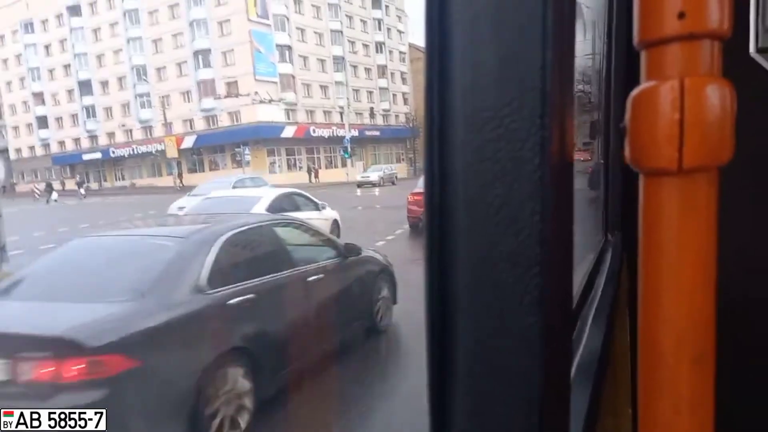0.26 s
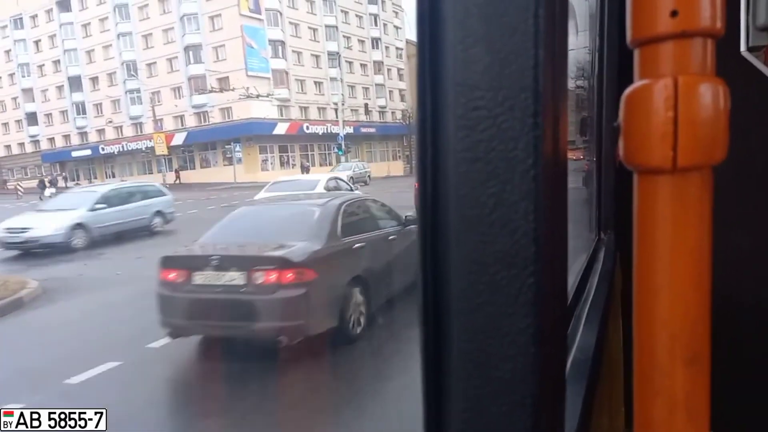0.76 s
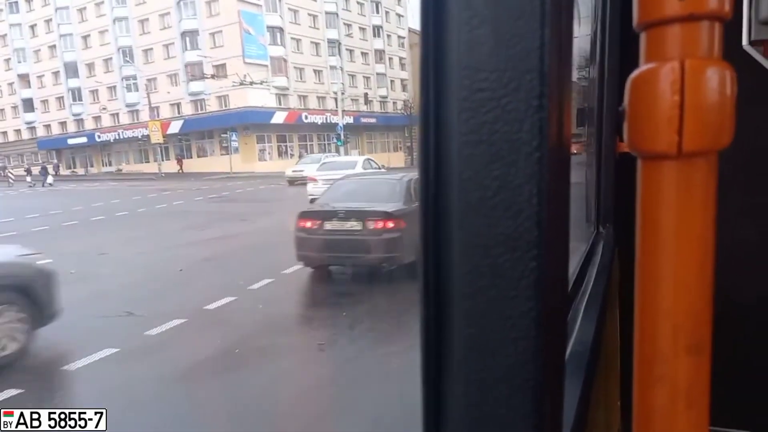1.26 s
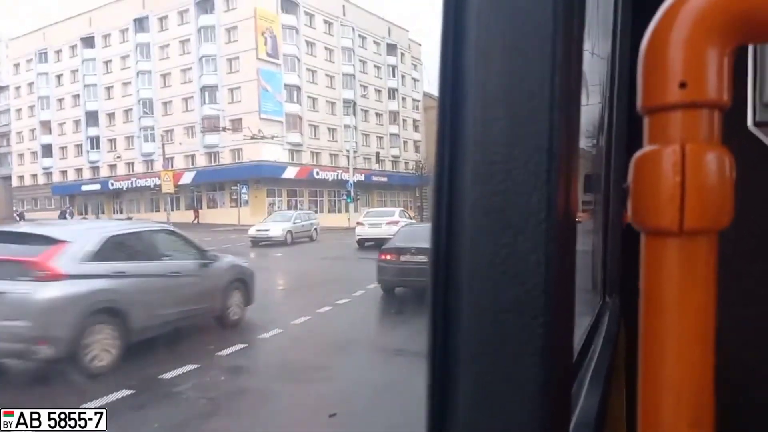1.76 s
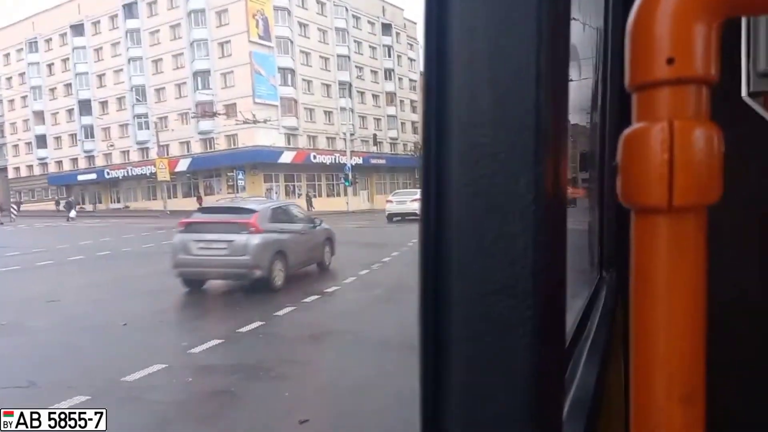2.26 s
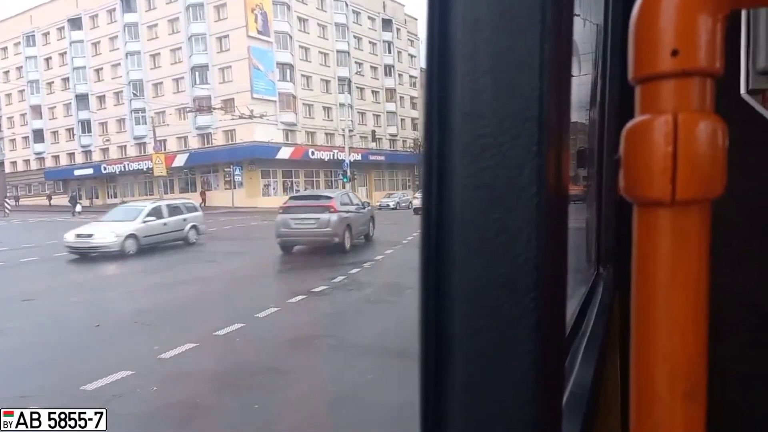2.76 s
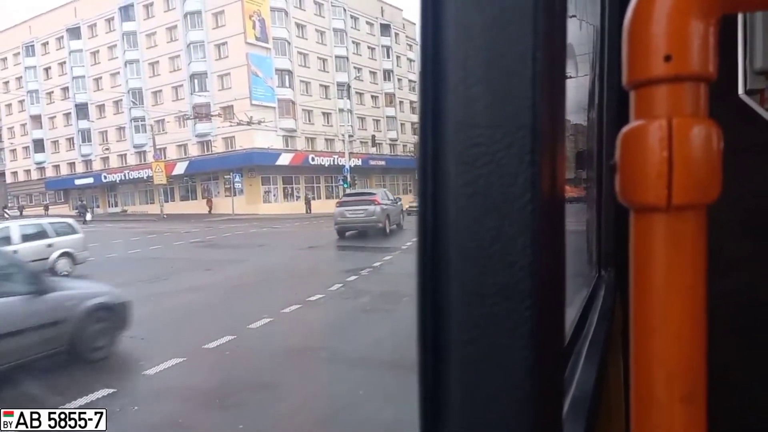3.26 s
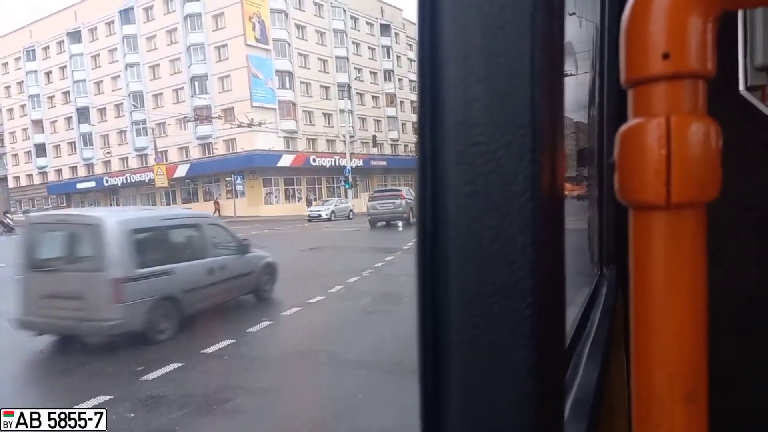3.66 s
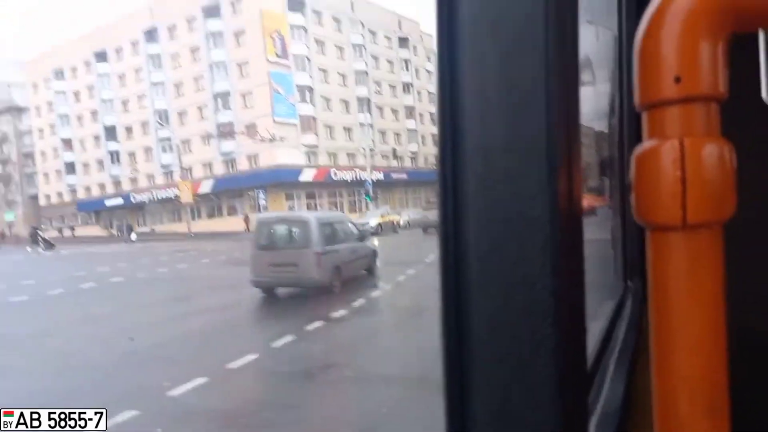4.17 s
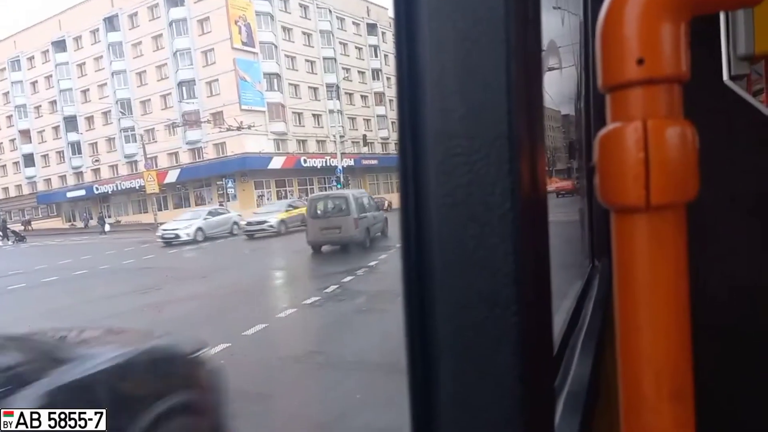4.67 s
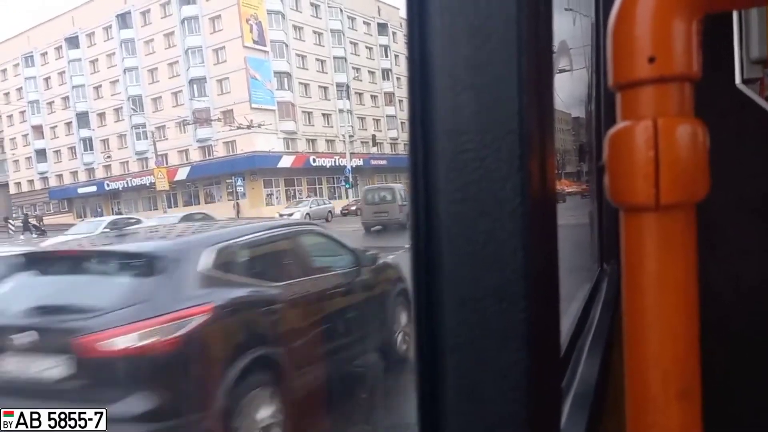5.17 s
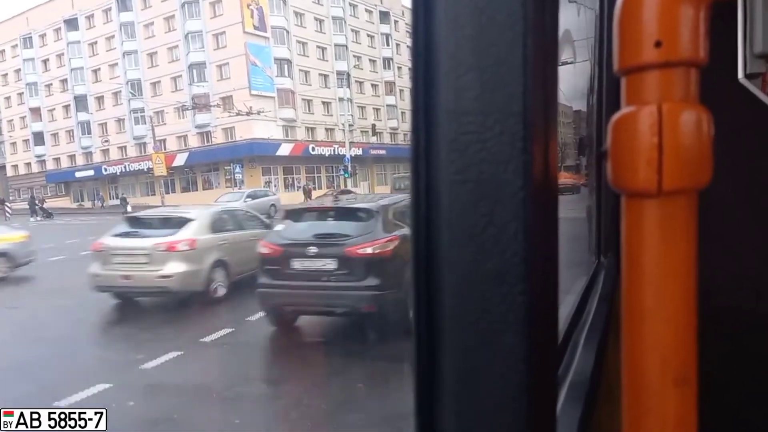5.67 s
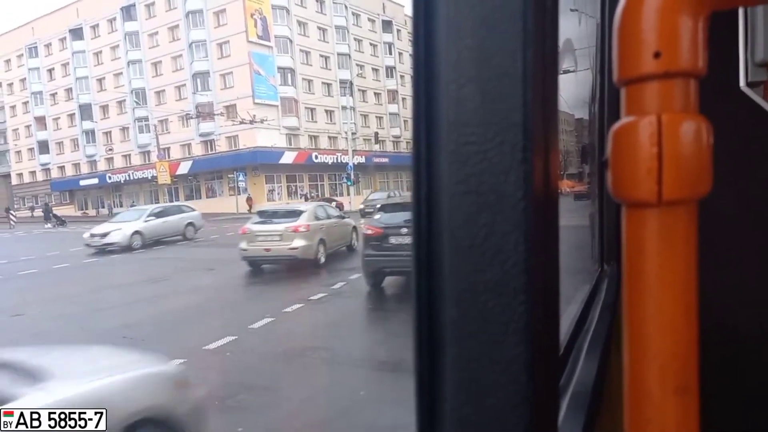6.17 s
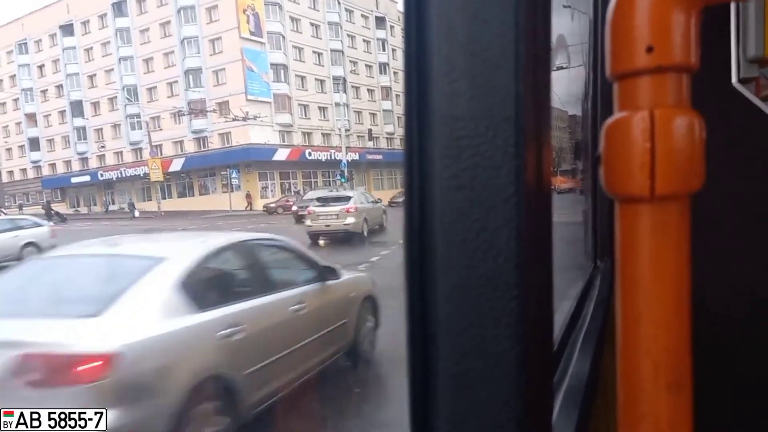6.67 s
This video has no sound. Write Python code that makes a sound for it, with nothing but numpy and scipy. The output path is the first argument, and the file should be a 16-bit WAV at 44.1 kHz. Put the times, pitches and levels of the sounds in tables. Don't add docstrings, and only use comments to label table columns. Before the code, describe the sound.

Heard on a phone inside a waiting bus, a diesel idles with a slow, unsteady low boom that fills the cabin. Close by, another heavy diesel pulls away, its tone climbing, then dropping at a gear shift with a faint airy hiss and thin squeal. It recedes as cars drone by over wet asphalt, their low notes swelling within a constant dull roar.

```python
import sys
import numpy as np
from scipy import signal
from scipy.fft import irfft, next_fast_len
from scipy.io import wavfile
from scipy.ndimage import uniform_filter1d

SR = 44100
rng = np.random.default_rng(int(sys.argv[2]) if len(sys.argv) > 2 else 0)


def transcribe(u):
    v = np.clip(np.atleast_2d(u).T, -1, 1)
    q = np.round(v * 32767).astype(np.int16)
    wavfile.write(sys.argv[1], SR, q)


def natural_amplitude(level_db):
    exponent = np.asarray(level_db, float) / 20
    return 10 ** exponent


N = 305613
T = np.arange(N) / SR

# (pitch [Hz], level [dB])
HUM_LINES = [(388, -52), (428, -49), (528, -52)]

# (frequency [Hz], density [dB
# per Hz], left minus right [dB], likeness of the ports [-1..1])
ROAR_COLOUR = [(30, 8, 1, .96), (50, 10, -1, .98), (66, 18, -1, .98), (78, 23, -1, .98), (95, 19, -1, .99),
               (125, 14, 0, .99), (180, 11, 0, .99),
               (230.4, 11, 2.5, 1), (336, 1, -1, 0.52), (470, 2, 0, 0.85), (796, -5, .5, -0.024),
                (990, -5.5, 0.5, -0.25), (1320, -9, 3.5, -0.35), (1486, -9.5, -1, 0.086),
                (1850, -15, -4, -0.37),
               (2050, -12, -4.5, 0), (2600, -16, -4, .1), (3020, -17.5, -2, -0.14),
               (4890, -20, -3.5, 0.086), (5340, -20.5, 0, 0.65), (5940, -16.5, -2, 1),
               (6470, -25, -8, 0.69), (6910, -32.5, -17, 0.1), (7200, -38, -7, .5), (8200, -40.5, -2, .65),
               (8300, -42, -3, 0.071), (11100, -40, -5.5, 0.63), (12800, -47, -8.5, 0.41),
               (15200, -46, 6, 0.27)]
# (time [s], swell [dB])
TRAFFIC_SWELL = [(0, 1), (.6, -1.5), (1.2, -1.5), (1.8, 1.5), (2.7, -0.5), (4, 1.07), (5, 2), (6.1, 0.5),
                 (6.93, 1.2)]
# (level [dB], share of the swell [0..1], creep [dB/s])
ROAR_LAYERS = [(0, 0.13, 0.4256), (-0.8, 0.56, 0.1738), (0, .9, 0.045), (-1.3, .4, 0.1)]

# (middle [s], pitch [Hz], half length [s],
# level [dB])
PASSING_CARS = [(.4, 476, 0.14, -40), (1.404, 69.3, 0.21, -26.5), (2.103, 74.7, 0.33, -21.5),
                (3.1, 428, 0.062, -37.5), (3.649, 80.76, .3, -22.5), (3.52, 148.6, .14, -29.5),
                (3.55, 231.7, .1, -33), (3.95, 238.2, 0.12, -34.5), (4.0, 110.2, 0.12, -29.5),
                (4.2, 71.2, 0.12, -20.5), (4.72, 72.57, 0.2, -14.5), (5.0, 149.5, 0.17, -30),
                (5.5, 67.9, .27, -27), (6.15, 545, .16, -42.5), (6.2, 79.5, 0.18, -20.5),
                (6.2, 33.3, .09, -32), (6.65, 76.5, 0.35, -24.5), (6.65, 148, 0.05, -27),
                (6.75, 133.3, .19, -25.5), (6.85, 238.6, 0.078, -33)]

# (time [s], firing rate [Hz], boom of the 3rd multiple [dB])
IDLE_CURVE = [(0, 29.35, -26), (.4, 29.25, -27), (1.05, 28.86, -22.5), (1.4, 28.9, -24.5),
              (1.75, 29.15, -16), (2.45, 29.84, -19), (2.8, 30.05, -22.5), (2.95, 29.93, -39),
              (3.2, 30, -20), (3.85, 29.6, -15), (4.2, 29.76, -20.5), (4.55, 29.82, -25.5),
              (5.25, 29.69, -23), (6.0, 29.78, -21.5), (6.2, 29.97, -35), (6.93, 29.63, -40.5)]
# (multiple of the firing rate [1], level [dB])
IDLE_MULTIPLES = [(1, -46), (1.5, -47), (2, -32), (4, -33), (5, -34), (6, -41), (7, -41), (8, -41),
                  (9, -46), (10, -47)]
REST_DB, REST_FOLLOWS = -1, 0.18

# (opens [s], attack [s], hold [s], jet [dB], opening [-1 narrow, thin .. 1 wide, rushing])
PUFFS = [
    (1.13, 0.13, .1, -56, -0.69),
    (1.438, 0.046, .05, -61, .5),
    (1.6, 0.033, 0.089, -66.5, .2),
    (1.712, 0.044, 0.14, -53.5, .8),
    (3.312, .05, 0.28, -65.5, .1),
    (3.678, 0.089, 0.28, -70, 0.4),
]
# (over the jet [dB], tilt [dB per unit of opening], dying [dB/s])
VENT_BANDS = [(0.5, 0, 99.5), (-1.5, -7.5, 111.5), (5.5, -6, 69), (4, 4, 68.5), (4, 7, 98)]
LEAK_DB, LEAK_DB_PER_S = -11.5, 41.5
VALVE_PAN_DB = -8

# (time [s], firing rate [Hz], load [dB], bark on the upper multiples [dB])
PULL_AWAY = [(0, 78.59, -8, 1.5), (.15, 81.86, -6.5, -9.5), (.3, 84.87, -11, -1), (.52, 89.91, -14, -5.5),
             (.9, 96.44, -18, 3), (1.16, 99.2, -16, -7), (1.27, 95.37, -18.5, -10), (1.36, 84.7, -26.5, 8),
             (1.5, 79.27, -10, -2), (1.75, 77.95, -17.5, 2), (2.02, 79, -20, 8.5),
             (2.3, 81.77, -15.5, -5.5), (3.0, 86.95, -25.5, 2), (4.0, 95.84, -30, 0), (5.0, 107, -23, 0),
             (5.5, 110.8, -23.5, 1), (6.0, 117.5, -32, -2), (6.93, 123.2, -28, 2.5)]
# (level at the pipe [dB], extra fading once it recedes [dB/s], left minus right [dB], lag [rad])
EXHAUST_STACK = [(0, 0.5, -1.3, 0.067), (-6.5, 5, 0, .03), (-14, 14, 0, 0.72), (-23, 11, 3.7, 0.66),
                 (-32, 7, 1.5, 1)]
RECEDES_S = 2.08
# (frequency [Hz], gain [dB])
WALL_GAIN = [(78, -0.5), (98, -2), (158, 0.5), (190, -1.5), (245, 0.5), (285, -4.5), (325, -0.5), (390, -6)]

# (from [Hz], to [Hz], patch height [Hz], share dropped left [0..1], right [0..1])
TREBLE_HOLES = [(6950, 7300, 350, .9, .15), (7300, 8250, 480, .95, .6), (8250, 8900, 330, .5, .2),
                (8900, 15000, 190, .33, .2), (15000, 15800, 400, .4, .1)]


def columns(table):
    s, *values = np.transpose(table)
    return [np.interp(T, s, v) for v in values]


def walk(rate):
    k = int(SR / rate)
    held = np.repeat(rng.standard_normal(N // k + 1), k)
    return 1.62 * uniform_filter1d(uniform_filter1d(held, k), k)[:N]


def band(lo_hz, hi_hz, likeness, edge=.06):
    size = next_fast_len(N)
    first = int(lo_hz * (1 - 2 * edge) * size / SR)
    hz = np.arange(first, int(hi_hz * (1 + 2 * edge) * size / SR)) * SR / size
    above_lo = np.tanh(np.log(hz / lo_hz) / edge * 2)
    above_hi = np.tanh(np.log(hz / hi_hz) / edge * 2)
    shape = np.sqrt((above_lo - above_hi) / 2)
    grain = rng.standard_normal((2, len(hz))) + 1j * rng.standard_normal((2, len(hz)))
    bins = np.zeros((2, size // 2 + 1), complex)
    bins[:, first:first + len(hz)] = shape * grain
    mid, side = (v / v.std() for v in irfft(bins, size)[:, :N])
    c = np.clip(likeness, -.99, .99)
    return (np.sqrt(1 + c) * mid + np.sqrt(1 - c) * side * np.array([[1], [-1]])) / np.sqrt(2)


def ports(pan_db):
    return natural_amplitude(np.array([pan_db / 2, -pan_db / 2]).reshape(2, -1))


def tone(turns, db, lag=0.):
    return np.sqrt(2) * natural_amplitude(db) * np.sin(2 * np.pi * turns - np.array([[0], [lag]]))


def hum():
    out = 0
    for hz, db in HUM_LINES:
        turns = np.cumsum(hz * (1 + .008 * walk(4))) / SR
        out = out + tone(turns, db + 3.5 * walk(6), .6)
    return out


def roar(phase):
    traffic_db = columns(TRAFFIC_SWELL)[0]
    boom_db, rumble_db, body_db, spray_db = (
        db + share * traffic_db + creep * T for db, share, creep in ROAR_LAYERS)
    hz, *colours = np.transpose(ROAR_COLOUR)
    third_octaves = 29 * 2 ** np.arange(0, 5.0, 1 / 3)
    finer_bands = 970 * 2 ** np.arange(0, 4.01, 1 / 7)
    edges = np.concatenate([third_octaves, finer_bands])
    shake = 1 + .07 * np.cos(2 * np.pi * phase)
    out, swell = 0, walk(1.9)
    for lo, hi in zip(edges[:-1], edges[1:]):
        middle = np.log(lo * hi) / 2
        density_db, pan_db, likeness = [np.interp(middle, np.log(hz), v) for v in colours]
        if lo < 300:
            drive_db = boom_db
        elif lo < 750:
            drive_db = rumble_db
        else:
            drive_db = body_db if lo < 3000 else spray_db
        flicker_db = .25 * swell + (1.1 if lo < 750 else .7) * walk(5)
        gain = natural_amplitude(density_db - 63.0 + 10 * np.log10(hi - lo) + drive_db + flicker_db)
        if 300 < lo < 3000:
            gain = gain * shake
        out = out + gain * ports(pan_db) * band(lo, hi, likeness, .04)
    return out


def cars():
    out = 0
    for s, hz, half, db in PASSING_CARS:
        passing = np.exp(-((T - s) / half) ** 2 / 2)
        out = out + passing * tone(hz * (T - s), db, 0.093)
    return out


def idle():
    hz, boom_db = columns(IDLE_CURVE)
    rest_db = REST_DB + REST_FOLLOWS * (boom_db - boom_db.mean())
    turns = np.cumsum(hz * (1 + .001 * walk(6))) / SR
    out = ports(-1.1) * tone(3 * turns + 0.33, boom_db + 2.2 * walk(13), .12)
    for order, db in IDLE_MULTIPLES:
        out = out + tone(order * turns + rng.random(), db + rest_db + 2.5 * walk(3), .03)
    return out, turns % 1


def squeal():
    swell = np.exp(-((T - 1.48) / .1) ** 2 / 2)
    return natural_amplitude(-49.0) * swell * ports(VALVE_PAN_DB) * band(2200, 2850, .2, .08)


def air():
    out = squeal()
    noises = (band(8200, 13300, .9, 0.071), band(13300, 15700, .8, .03), band(6200, 6850, .55, .04),
              band(5500, 6400, .5, .05), band(1200, 5900, .26))
    flutter = natural_amplitude(0.67 * walk(25)) * ports(VALVE_PAN_DB)
    for (db, per_opening, dying), noise in zip(VENT_BANDS, noises):
        power = 0
        for s, attack, hold, jet_db, opening in PUFFS:
            rise = np.clip((T - s) / attack, 0, 1) ** 2
            shut = np.maximum(T - s - attack - hold, 0)
            fall = natural_amplitude(-dying * shut) ** 2 + natural_amplitude(LEAK_DB - LEAK_DB_PER_S * shut) ** 2
            power = power + (rise * natural_amplitude(jet_db + db + per_opening * opening)) ** 2 * fall
        out = out + flutter * np.sqrt(power) * noise
    return out


def neighbour():
    hz, load_db, bark_db = columns(PULL_AWAY)
    turns = np.cumsum(hz * (1 + .0015 * walk(14))) / SR
    start = (.66, .8, .3, .6, .1)
    wall_hz, wall_db = np.transpose(WALL_GAIN)
    receding_s = np.maximum(T - RECEDES_S, 0)
    out = 0
    for k, (db, fade, pan_db, lag) in enumerate(EXHAUST_STACK):
        pipe_db = load_db + (k > 0) * bark_db + db
        heard_db = pipe_db - fade * receding_s + np.interp((k + 1) * hz, wall_hz, wall_db)
        unsteady_db = (1.2 + .5 * k) * walk(11)
        out = out + ports(pan_db) * tone((k + 1) * turns + start[k], heard_db + unsteady_db, lag)
    return out


def patchy_treble(x):
    hz, s, cells = signal.stft(x, SR, nperseg=1024)
    frame = np.arange(len(s)) // 5
    keep = np.ones(cells.shape)
    for lo, hi, height, *share in TREBLE_HOLES:
        rows = (hz >= lo) & (hz < hi)
        patch = ((hz[rows] - lo) / height).astype(int)
        luck = rng.random((2, int((hi - lo) / height) + 1, len(s) // 5 + 1))
        luck = luck[:, patch][:, :, frame]
        keep[:, rows] = luck > np.reshape(share, (2, 1, 1))
    return signal.istft(cells * keep, SR, nperseg=1024)[1][:, :N]


def scene():
    engine, phase = idle()
    return neighbour() + engine + cars() + roar(phase) + air() + hum()


def band_limit(x):
    return signal.sosfilt(signal.butter(12, 15770, fs=SR, output="sos"), x)


def record(dry):
    rounded = np.tanh(1.031 * dry) / 1.052
    return band_limit(patchy_treble(rounded))


dry = scene()
out = record(dry)
transcribe(out)
```